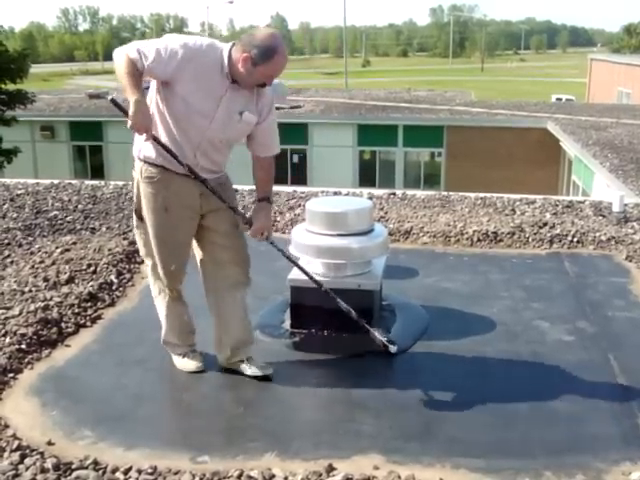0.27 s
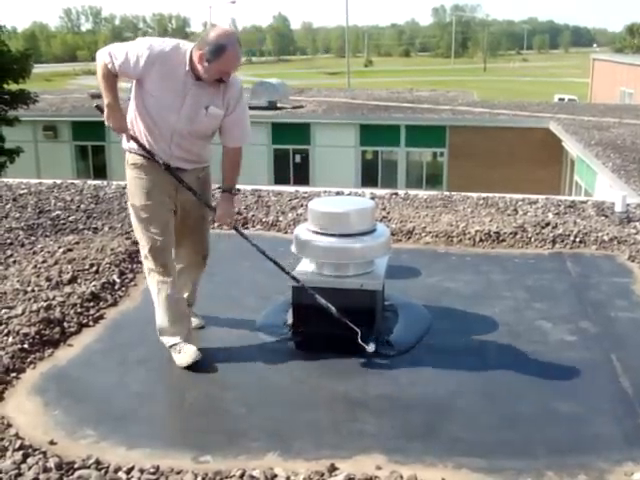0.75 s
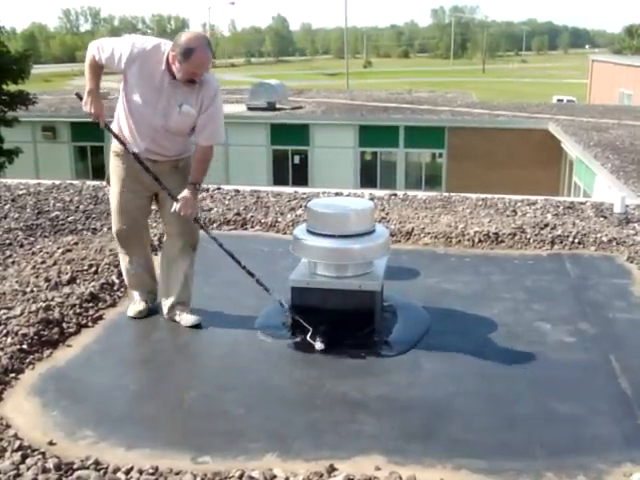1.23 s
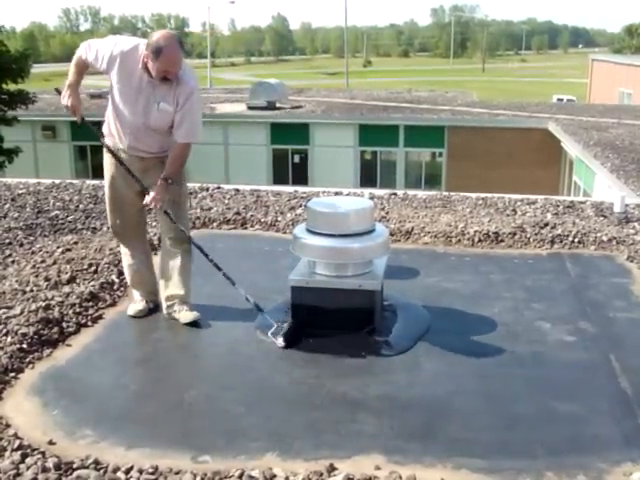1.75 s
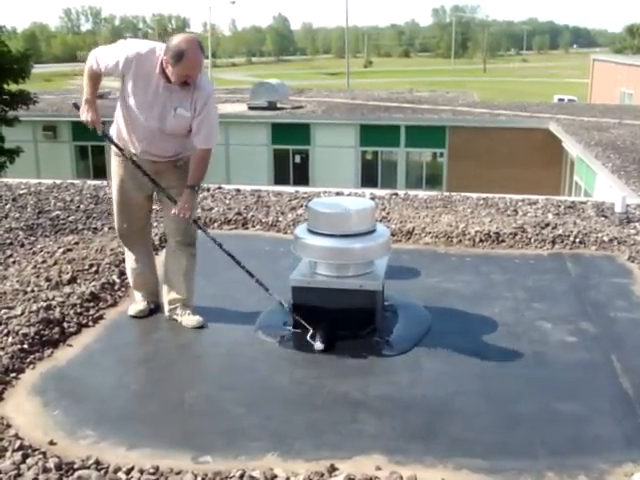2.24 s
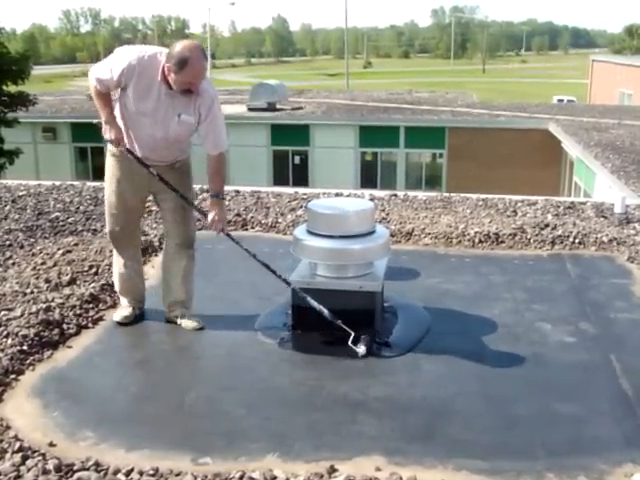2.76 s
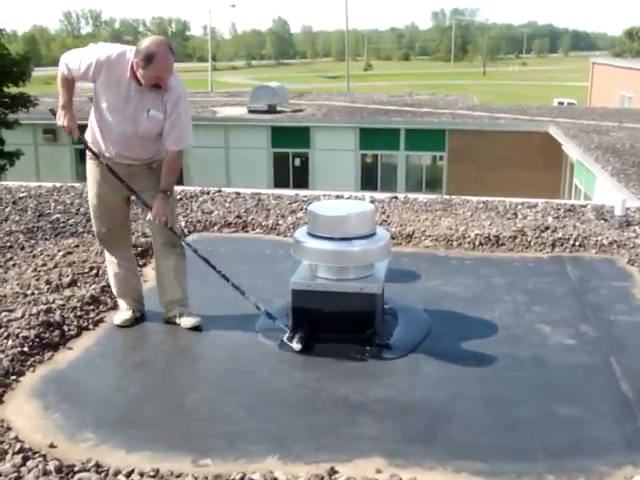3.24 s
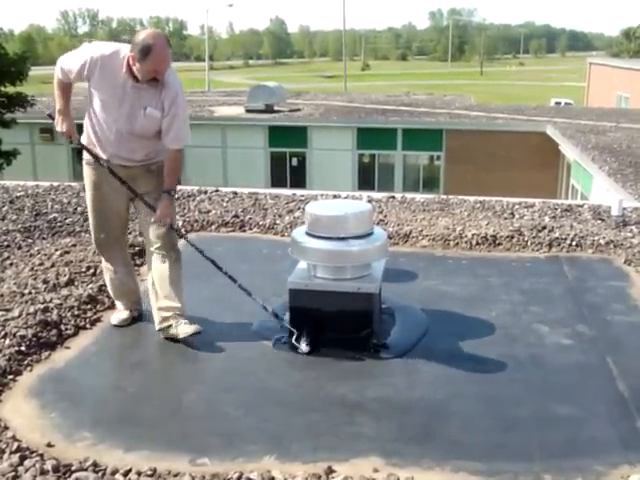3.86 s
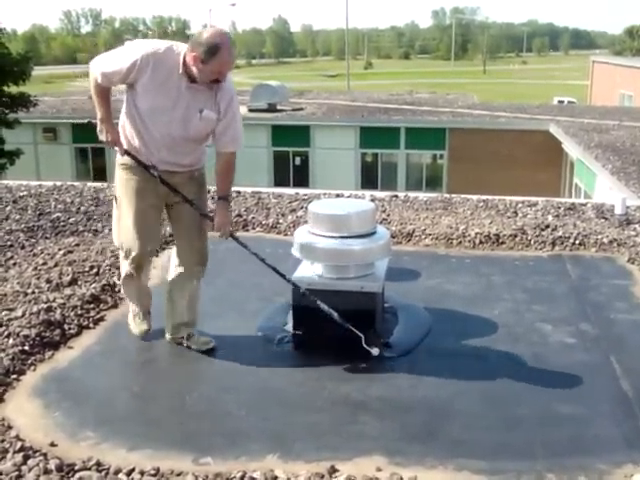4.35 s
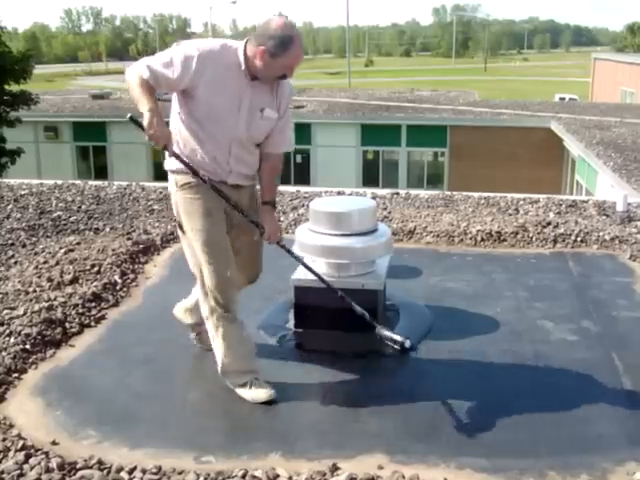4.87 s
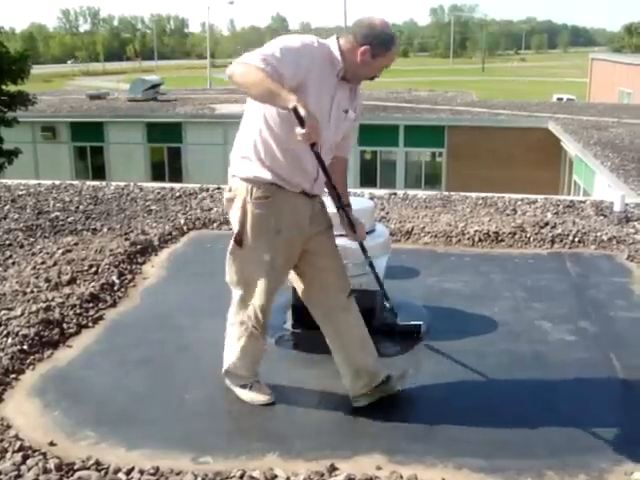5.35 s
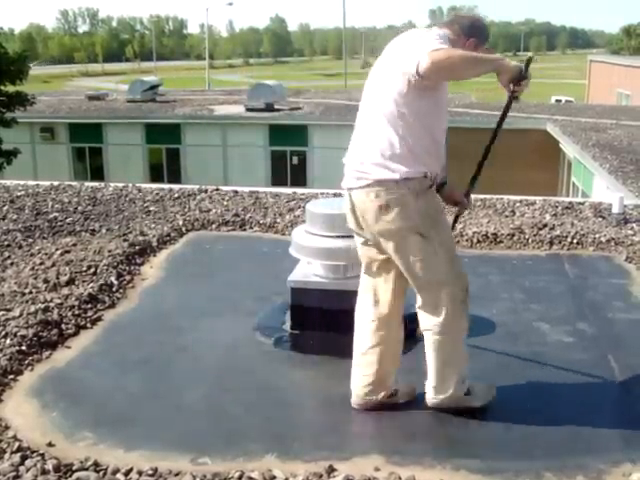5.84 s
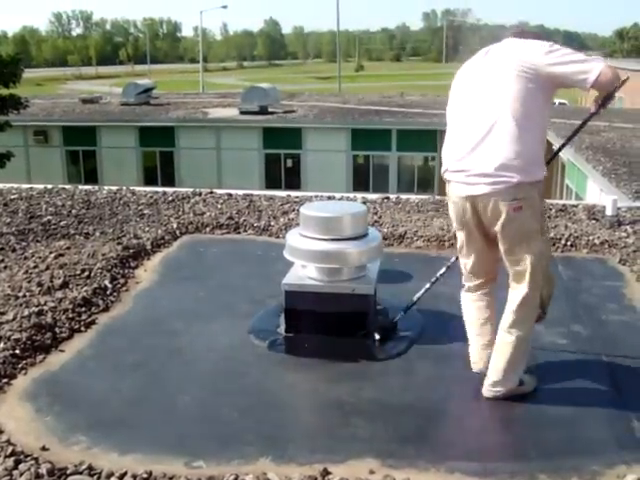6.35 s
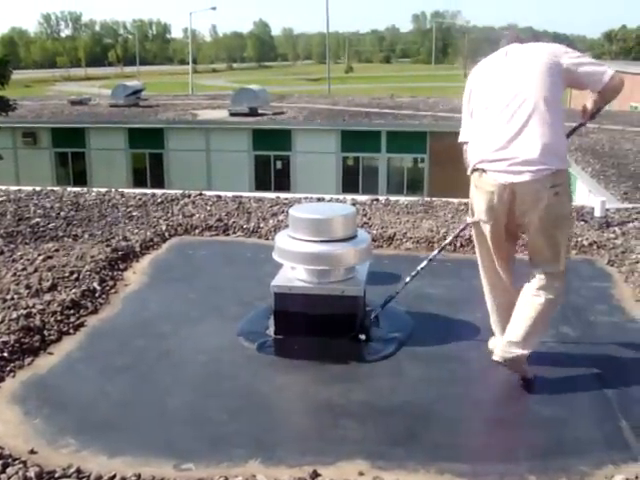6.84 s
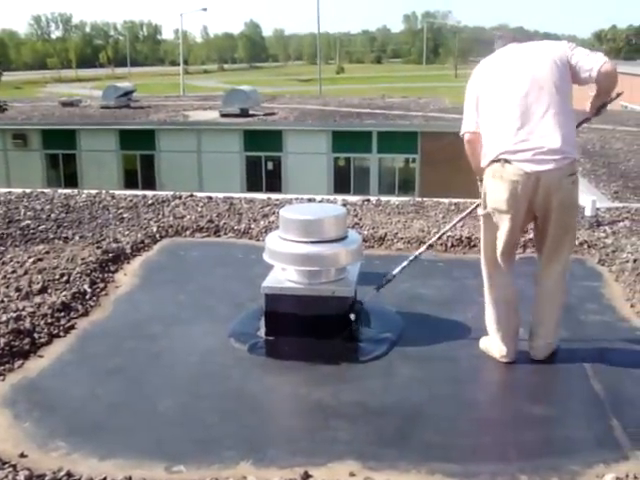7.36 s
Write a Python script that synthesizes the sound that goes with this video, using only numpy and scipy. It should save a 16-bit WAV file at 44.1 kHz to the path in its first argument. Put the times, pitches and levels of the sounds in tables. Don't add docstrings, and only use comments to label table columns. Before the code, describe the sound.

Continuous buzzy fan hum, low rumble and airy hiss fill an open rooftop. Soft tacky rubbing and gritty ticks come first, then mostly fans alone. Midway a few boomy metal knocks arrive in quick succession, the loudest with a dull rebound. Then a scuff, a bright pole clack, a short rattling stutter and softer dragging. Everything is picked up by one small camera microphone with a faint high whine.

```python
import sys
import numpy as np
from scipy import signal
from scipy.fft import rfft, irfft
from scipy.io import wavfile

SR = 44100
rng = np.random.default_rng(int(sys.argv[2]) if len(sys.argv) > 2 else 0)


def to_wav(s):
    ch = np.atleast_2d(s).T
    pcm = np.round(np.clip(ch, -1, 1) * 32767)
    wavfile.write(sys.argv[1], SR, pcm.astype(np.int16))


def magnitude_from_level(level_db):
    exponent = np.asarray(level_db, float) / 20
    return 10 ** exponent


N = 335160

SHAFT_HZ = 27.5
# time in seconds, lag in turns.
SHAFT_LAG = [(0, .05), (.4, .085), (1.2, -.055), (2, -.017), (2.7, .07), (3.2, -.018), (3.7, .008),
             (4.3, -.045), (5.4, .13), (6.45, -.12), (7.27, .14), (7.6, .03)]
# place in turns, sign, housing ring in Hz, its width in Hz, peak in dB.
PUFFS = [(0.462, 1, 209, 73, -24.7), (0.788, -1, 414, 144, -29.2), (0.165, -1, 363, 383, -29.2),
         (0.657, 1, 211, 85, -27.0), (0.812, 1, 203, 278, -24.4)]
# time in seconds, level in dB.
LATE_PUFF_LEVEL = [(0, -5), (1, 1), (2.8, 1), (3.3, -3), (4.9, -6), (5.5, -2), (7.6, -4)]
# pitch in Hz, width in Hz, extra share.
HOUSING_PANELS = [(55, 12, .4), (248, 14, .25), (357, 14, .6), (455, 45, .5)]
# pitch in Hz, width in Hz, extra share, start and end in seconds.
SHADED_PANELS = [(357, 14, .9, 4.6, 8), (357, 14, -1.9, 5.25, 6.75), (398, 35, -.6, 4.6, 8),
                 (206, 45, .25, 4.6, 8), (440, 14, .3, 4.6, 6.7)]
SHADE_TAKES_S = 0.2
# shaft multiple, peak in dB, start and end in seconds.
BLADE_TONE = [(12, -43, 5.35, 6.7), (12, -47, 6.95, 8)]

# frequency in Hz, density in dB per Hz.
RUMBLE_SPECTRUM = [(28, -11), (42, 1), (66, -3), (92, 4), (120, -6), (160, -5), (210, -6), (300, -3),
                   (350, -5.5), (400, -4.5), (490, -1), (560, -8), (700, -20)]
# frequency in Hz, density in dB per Hz.
RUSH_SPECTRUM = [(280, -26.5), (480, -9.5), (549, -39), (588, -13), (684, -6.5), (744, -5.5), (776, -2.5),
                 (896, 0), (1200, -7), (1390, -5.5), (1590, -10.5), (2030, -25), (3040, -26.5), (3600, -38),
                 (4680, -61), (7920, -120)]
# frequency in Hz, density in dB per Hz.
HISS_SPECTRUM = [(2500, -3), (3400, -6), (3900, -0.5), (4800, -6), (5400, -6), (6500, -9.5), (8500, -7),
                 (10000, -8.5), (10500, -10), (11000, -13.5), (11500, -20), (12000, -31), (12400, -46)]
# time in seconds, level in dB.
RUSH_LEVEL = [(0, -32.5), (1.04, -31.5), (1.75, -33), (2.96, -32), (4.19, -31.5), (4.82, -26.5),
              (5.33, -29.5), (6.05, -29.5), (6.3, -28.5), (7.1, -32), (7.6, -30)]
RUMBLE_DB, HISS_DB = -36, -54.5

# top in seconds, level in dB, swell and fade in seconds, bright share from 0 to 1.
STROKES = [(0, -42.5, .05, .07, 0.4), (.26, -40, .08, .04, 0.25), (.53, -50, 0.12, .1, 0.7),
           (.67, -47, 0.04, 0.15, 0.4), (4.19, -51, .07, 0.066, 0.4), (4.55, -47.5, .3, .3, .6),
           (2.93, -46.5, .06, .05, .5), (4.415, -39.5, .03, .05, .97), (4.9, -50, .3, .4, .7),
           (5.74, -41, .08, .015, .6), (6.04, -37, 0.026, 0.02, 0.6), (6.55, -45.5, 0.24, 0.35, 0),
           (7.0, -50, .03, 0.022, .7), (7.44, -40.5, 0.57, 0.15, 0)]
# frequency in Hz, density in dB per Hz.
DULL_SPECTRUM = [(1500, 16), (2200, 7), (2800, 0.5), (3300, -8), (4200, -40.5), (5500, -63)]
# frequency in Hz, density in dB per Hz.
BRIGHT_SPECTRUM = [(2800, 0), (3600, 1), (4300, 1), (5500, -4), (7000, -5), (8200, -8), (9500, -39)]
TACK_DB, TACK_BRIGHT_SHARE = -51, 0.23
# top in seconds, level in dB, swell and fade in seconds.
SOLE_DRAGS = [
    (5.73, -45, .08, .02),
    (7.44, -47, 0.1, .1),
]
SOLE_HZ, SOLE_WIDTH_HZ = 2660, 900

# top in seconds, level in dB, swell and fade in seconds, pitch in Hz.
SKIN_DRAGS = [(.1, -40, .2, .2, 220), (.43, -33, .14, .1, 150), (.5, -40, .08, .06, 430),
              (.74, -33, .04, .05, 255), (.86, -35, .06, .06, 115), (4.2, -37, .05, .12, 270),
              (4.45, -33, .15, .3, 290), (4.47, -38, .12, .2, 470), (4.7, -36, .15, .1, 200),
              (6.57, -34, .04, .04, 260), (6.71, -33, .04, .06, 200), (6.7, -34, .02, .05, 440),
              (7.115, -35, .025, .035, 300)]
# frequency in Hz, density in dB per Hz.
SKIN_SPECTRUM = [(100, 24), (150, -1), (260, -10.5), (400, -18), (520, -15.5), (800, -18)]
SKIN_IDLE_DB = -54
SKIN_SPREAD = 1.2

LINE_HZ, FRAME_HZ, FIRST_FRAME_S = 7704.2, 28.919, 0.0291
# start in seconds, settling in seconds, slip per frame in radians.
EXPOSURE = [(0, 0, -1.2), (0, .08, .35), (.37, 0, -2.25), (.61, 0, -4.6), (.86, 0, -3.2), (1.14, 0, -3.8),
            (1.43, 0, -2.25), (1.94, 0, -3.1), (2.42, 0, -3.9), (2.67, 0, -4.5), (3.19, 0, -3.15),
            (3.71, 0, -1.65), (3.96, 0, -.05), (4.21, 0, -.7), (4.7, .4, 6), (5.37, 0, 5.4),
            (5.62, .58, 30.5), (6.47, .43, 23.4)]
# pitch in Hz, peak in dB.
WHISTLES = [(7864.1, -57.8), (7229, -74), (6640, -75), (7919, -77)]
OFFSET, OFFSET_KICK = -0.067, -0.016
KICK_S, KICK_RISE_S, KICK_FADE_S = 4.4, 0.25, 0.7

# start in seconds, peak in dB, pitch in Hz.
TICKS = [(.055, -31, 3800), (.411, -34, 5000), (.438, -27, 4600), (.458, -28.5, 5200), (.472, -28.5, 5200),
         (.485, -28.5, 5200), (.637, -37, 3800), (.794, -33, 4200), (.864, -33, 3900), (3.661, -37, 3600),
         (3.714, -36, 5200), (4.343, -31, 4400), (4.352, -31, 4300), (4.375, -33, 5000), (4.384, -31, 3700),
         (4.475, -33, 3800), (4.527, -32, 4400), (4.668, -32, 4000), (5.189, -27, 5600), (5.2, -34, 6000),
         (6.0458, -22, 4600), (6.986, -36, 3800), (7.007, -34, 3500), (7.041, -32, 5800),
         (7.094, -31, 4600), (7.101, -32, 4200), (7.363, -28, 5200), (7.572, -31, 3600)]
# start in seconds, peak in dB, boom in dB, brightness in dB, sign of first swing.
KNOCKS = [
    (4.197, -25, -14, 8, -1),
    (4.3012, -15.5, 5.5, 2.5, 1),
    (4.426, -9.5, -0.5, -4, 1),
    (4.707, 0, 2, -3.5, -1),
    (4.767, -9.5, 2.5, -8.5, 1),
    (6.02, -14, -1, -2, -1),
    (6.136, -18, -15, -17, 1),
]
# start in seconds, peak, boom and brightness in dB, sign of first swing.
CLACK = [
    (6.1, -5.5, -10, 3.5, 1),
]
# pitch in Hz, level in dB, 60 dB decay in seconds.
BOOM_MODES = [(166.5, -2, 0.062), (322, -18.5, 0.023), (352, 2, 0.032), (449, -3.5, 0.032)]
# pitch in Hz, level in dB, 60 dB decay in seconds.
BODY_MODES = [(780, -14, 0.014), (944, 3.5, 0.0081), (1172, 10.5, 0.0046), (1464, 2.5, 0.0047)]
# pitch in Hz, level in dB, 60 dB decay in seconds.
KNOCK_MODES = [(2000, -7, 0.02), (2700, -27, 0.037), (3200, -10, 0.014), (3630, -12.5, 0.022),
               (4320, -9, 0.017), (4700, -11, 0.01), (6950, -34, 0.0086)]
# pitch in Hz, level in dB, 60 dB decay in seconds.
EDGE_MODES = [(2400, -8, .014), (2680, -6, .014), (3300, -17, .009), (4050, -14, .01), (4800, -23, .01),
              (5550, -30, .01), (7300, -24, .01)]
# pitch in Hz, level in dB, 60 dB decay in seconds.
FRAME_MODES = [(2020, -6, 0.0059), (2490, -5, 0.0055), (2940, -12, 0.017), (3620, -12, 0.009),
               (3700, -19, 0.016), (6360, -21, 0.011)]
# first and last slip in seconds, number of slips, gap growth, peak in dB.
PUSH_CHATTER = [
    (6.0242, 6.0274, 2, 1, -15.5),
    (6.0299, 6.0455, 6, 1.16, -14),
]
# first and last slip in seconds, number of slips, gap growth, peak in dB.
PULL_CHATTER = [
    (6.6815, 6.711, 5, 1, -8.5),
    (6.7225, 6.743, 3, 1.05, -10.5),
]
SLIP_JITTER_S = 0.00027


def in_time(rows):
    s, value = np.transpose(rows)
    return np.interp(np.arange(N) / SR, s, value)


def rms_one(x):
    return x / np.sqrt(np.mean(x ** 2) + 1e-20)


def drift(rate):
    r = np.exp(-80 * np.pi * rate / SR)
    white = rng.standard_normal(N // 40 + 2002)
    slow = signal.lfilter([1], [1, -2 * r, r * r], white)[2000:]
    return np.interp(np.arange(N) / 40, np.arange(len(slow)), rms_one(slow))


def ring(clicks, hz, t60):
    r, w = magnitude_from_level(-60 / (t60 * SR)), 2 * np.pi * hz / SR
    return signal.lfilter([0, np.sin(w)], [1, -2 * r * np.cos(w), r * r], clicks + 1e-18)


def band(x, low_hz, high_hz, order=2):
    return signal.sosfilt(signal.butter(order, [low_hz, high_hz], "band", fs=SR, output="sos"), x)


def coloured(source, spectrum, patchy_db, gust_db):
    octave = np.log2(np.maximum(np.arange(N // 2 + 1) * SR / N, 1))
    hz, db = np.transpose(spectrum)
    shaped = rfft(source) * magnitude_from_level(np.interp(octave, np.log2(hz), db, left=-200, right=-200))
    out = 0
    gust = gust_db * drift(1.0)
    for centre in np.arange(np.log2(hz[0]), np.log2(hz[-1]) + 0.5, 0.5):
        window = np.clip(1 - 2 * abs(octave - centre), 0, 1)
        out = out + irfft(shaped * window, N) * magnitude_from_level(gust + patchy_db * drift(6.8))
    return rms_one(out)


def swells(rows, share=1):
    t = np.arange(0, N + 64, 64) / SR
    top_s, db, swell_s, fade_s = np.transpose(rows)[:4, :, None]
    late = t - top_s
    decades = np.minimum(late / np.maximum(swell_s, 0.003), -late / np.maximum(fade_s, 0.003))
    power = share * magnitude_from_level(2 * db) * 10 ** decades
    return np.interp(np.arange(N) / SR, t, power.sum(axis=0))


def heard(from_s, to_s):
    t = np.arange(N) / SR
    return np.clip(np.minimum(t - from_s, to_s - t) / SHADE_TAKES_S + 0.5, 0, 1)


def shaft_turns():
    return SHAFT_HZ * np.arange(N) / SR - in_time(SHAFT_LAG)


def shaft():
    turns = shaft_turns()
    out = np.zeros(N)
    for place, sign, hz, width_hz, peak_db in PUFFS:
        at = np.flatnonzero(np.diff(np.floor(turns - place)) > 0)
        late_by, stronger = rng.standard_normal((2, len(at)))
        clicks = np.zeros(N)
        clicks[np.clip(at + (3 * late_by).astype(int), 0, N - 1)] = sign * magnitude_from_level(1.2 * stronger)
        t60 = np.log(1000) / (np.pi * width_hz)
        height = SR / (2 * np.e * np.pi * width_hz)
        late_db = in_time(LATE_PUFF_LEVEL) * (place > 0.75)
        out += magnitude_from_level(peak_db + late_db + 0.52) / height * ring(ring(clicks, hz, t60), hz, t60)
    return out


def housing(puffs):
    out = puffs.copy()
    always = [(*panel, -1, 9) for panel in HOUSING_PANELS]
    for hz, width_hz, share, from_s, to_s in always + SHADED_PANELS:
        r = np.exp(-np.pi * width_hz / SR)
        zeros = np.array([1, 0, -1]) * (1 - r * r) / 2
        poles = [1, -2 * r * np.cos(2 * np.pi * hz / SR), r * r]
        out += heard(from_s, to_s) * share * signal.lfilter(zeros, poles, puffs)
    return out


def air():
    rumble = coloured(rng.standard_normal(N), RUMBLE_SPECTRUM, patchy_db=0.3, gust_db=0)
    rush = coloured(rng.standard_normal(N), RUSH_SPECTRUM, patchy_db=1.3, gust_db=-0.13)
    hiss = coloured(rng.standard_normal(N), HISS_SPECTRUM, patchy_db=0.3, gust_db=0)
    return magnitude_from_level(RUMBLE_DB) * rumble + magnitude_from_level(in_time(RUSH_LEVEL)) * rush + magnitude_from_level(HISS_DB) * hiss


def roller():
    sizes = magnitude_from_level(2.5 * np.minimum(rng.exponential(1, N), 5)) * rng.choice([-1, 1], N)
    grains = sizes * (rng.random(N) < 3500 * magnitude_from_level(3 * drift(40)) / SR)
    bright = np.array(STROKES)[:, 4:]
    tack_power = magnitude_from_level(2 * TACK_DB)
    dull_power = swells(STROKES, 1 - bright) + (1 - TACK_BRIGHT_SHARE) * tack_power
    sharp_power = swells(STROKES, bright) + TACK_BRIGHT_SHARE * tack_power
    dull = np.sqrt(dull_power) * coloured(grains, DULL_SPECTRUM, patchy_db=-1, gust_db=1.0)
    sharp = np.sqrt(sharp_power) * coloured(grains, BRIGHT_SPECTRUM, patchy_db=1.5, gust_db=2.5)
    singing = band(grains, SOLE_HZ - SOLE_WIDTH_HZ / 2, SOLE_HZ + SOLE_WIDTH_HZ / 2)
    return dull + sharp + np.sqrt(swells(SOLE_DRAGS)) * rms_one(singing)


def drumming():
    idle = coloured(rng.standard_normal(N), SKIN_SPECTRUM, patchy_db=-1, gust_db=-4.0)
    out = magnitude_from_level(SKIN_IDLE_DB) * idle
    noise = rng.standard_normal(N)
    for row in SKIN_DRAGS:
        hz = row[4]
        out += np.sqrt(swells([row])) * rms_one(band(noise, hz / SKIN_SPREAD, hz * SKIN_SPREAD))
    return out


def camera_whine():
    t = np.arange(N) / SR
    starts = np.arange(FIRST_FRAME_S, N / SR, 1 / FRAME_HZ)
    from_s, settle_s, slip = np.transpose(EXPOSURE)
    settled = np.clip((starts[:, None] - from_s) / (settle_s + 1e-6), 0, 1)
    frame_slip = settled @ np.diff(slip, prepend=0)
    slips = np.zeros(N)
    slips[(starts * SR).astype(int)] = (frame_slip - 1.2) % (-2 * np.pi) + 1.2
    ease = np.exp(-1 / (0.00041 * SR))
    phase = signal.lfilter([1 - ease], [1, -ease], np.cumsum(slips))
    whistles = sum(magnitude_from_level(db) * np.sin(2 * np.pi * hz * t) for hz, db in WHISTLES)
    return magnitude_from_level(-44.5) * np.sin(2 * np.pi * LINE_HZ * t + phase) + whistles


def offset():
    since = np.maximum(np.arange(N) / SR - KICK_S, 0)
    sag = (1 - np.exp(-since / KICK_RISE_S)) * np.exp(-since / KICK_FADE_S)
    return OFFSET + OFFSET_KICK * sag * 1.5


def ticks():
    out = np.zeros(N)
    t = np.arange(400) / SR
    for s, peak_db, hz in TICKS:
        dying = rng.standard_normal(len(t)) * np.exp(-t / 0.0018)
        burst = band(dying, hz * 0.68, hz * 1.4)
        i = round(s * SR)
        out[i:i + len(t)] += magnitude_from_level(peak_db - 3.0) * burst / abs(burst).max()
    return out


def blows(events, bright_modes, crack_db):
    s, peak_db, boom_db, bright_db, swing = np.transpose(events)
    at = np.round((s + 0.001) * SR).astype(int)
    chance_db = rng.normal(0, 1.5, (len(at), 16))
    extra_db = [boom_db] * len(BOOM_MODES) + [0 * s] * len(BODY_MODES) + [bright_db] * len(bright_modes)
    out = np.zeros(N)
    for k, (hz, level_db, t60) in enumerate(BOOM_MODES + BODY_MODES + bright_modes):
        clicks = np.zeros(N)
        clicks[at] = np.sign(swing) * magnitude_from_level(peak_db + extra_db[k] + level_db - 16.0 + chance_db[:, k])
        rebound = np.roll(clicks, round(SR / hz / 2))
        out += ring(clicks - 1.37 * rebound, hz, t60)
    crack = np.zeros(N)
    crack[at] = magnitude_from_level(peak_db + bright_db + crack_db)
    envelope = signal.lfilter([1], [1, -magnitude_from_level(-60 / (0.016 * SR))], crack)
    return out + band(envelope * rng.standard_normal(N), 1200, 6000)


def blades():
    turns = shaft_turns()
    out = np.zeros(N)
    for multiple, db, from_s, to_s in BLADE_TONE:
        out += magnitude_from_level(db) * heard(from_s, to_s) * np.sin(2 * np.pi * multiple * turns)
    return out


def chatter(runs, swing, boom_db, bright_db):
    rows = []
    for first_s, last_s, slips, growth, peak_db in runs:
        place = np.cumsum(growth ** np.arange(round(slips))) - 1
        for s in first_s + (last_s - first_s) * place / place[-1]:
            jitter_s = SLIP_JITTER_S * rng.uniform(-1, 1)
            rows.append((s + jitter_s, peak_db, boom_db, bright_db, swing))
    return rows


def scene():
    fans = housing(shaft()) + blades() + air()
    push = chatter(PUSH_CHATTER, swing=-1, boom_db=-2, bright_db=-6.5)
    pull = chatter(PULL_CHATTER, swing=1, boom_db=2.5, bright_db=2.5)
    frame = band(blows(push + pull, FRAME_MODES, crack_db=-22.5), 170, 4800)
    knocks = blows(KNOCKS, KNOCK_MODES, crack_db=-14.0)
    clack = blows(CLACK, EDGE_MODES, crack_db=-15.0)
    hits = band(knocks + clack + frame + ticks(), 110, 7600, order=4)
    return (fans + roller() + drumming() + hits)[None]


def band_limit(x):
    return signal.sosfilt(signal.butter(12, 12220, fs=SR, output="sos"), x)


def record(dry):
    capsule = signal.sosfilt(signal.butter(4, 40, "high", fs=SR, output="sos"), dry)
    rounded = 0.85 * np.tanh((capsule + camera_whine()) / 0.85)
    return band_limit(rounded + offset())


dry = scene()
out = record(dry)
to_wav(out)
```